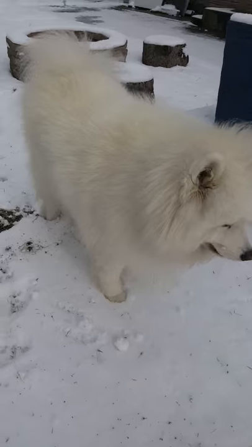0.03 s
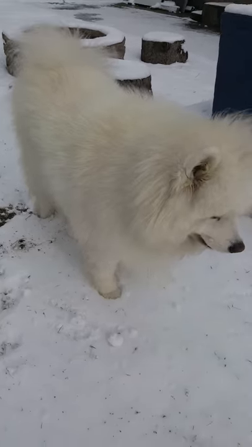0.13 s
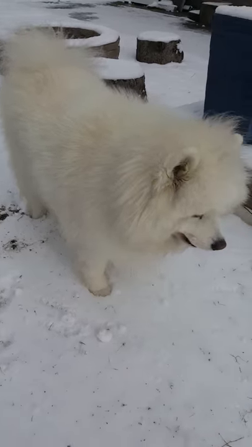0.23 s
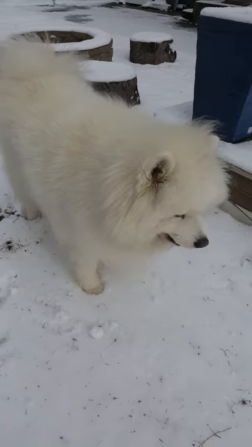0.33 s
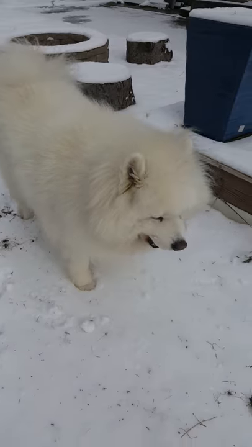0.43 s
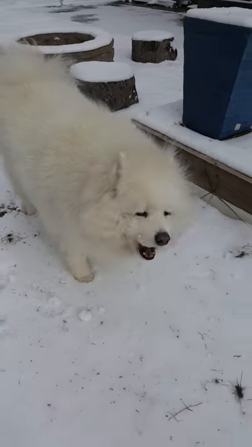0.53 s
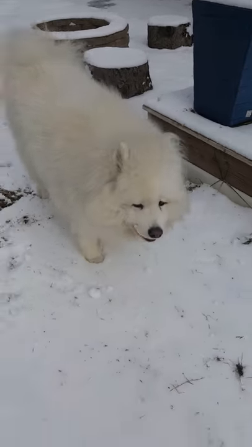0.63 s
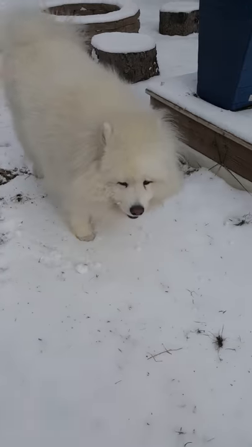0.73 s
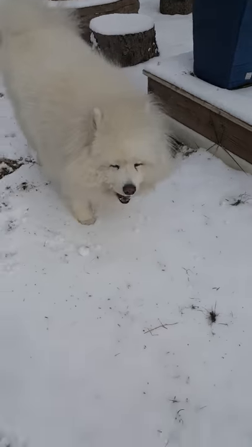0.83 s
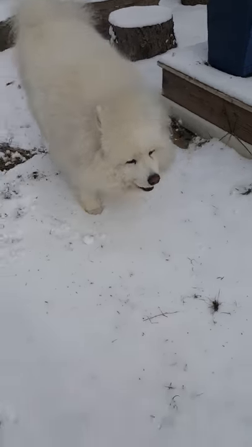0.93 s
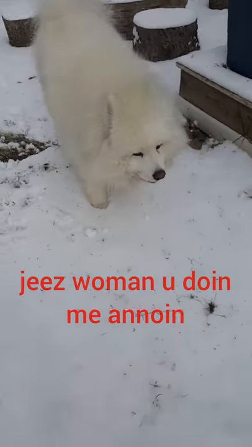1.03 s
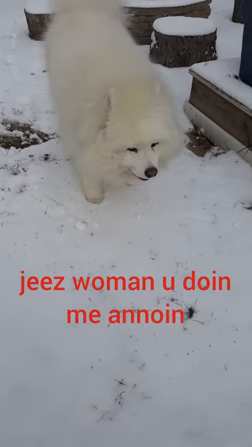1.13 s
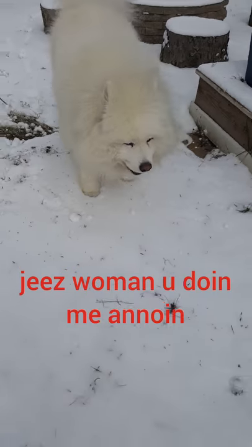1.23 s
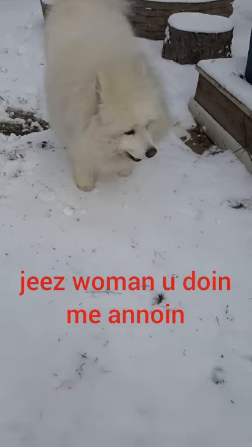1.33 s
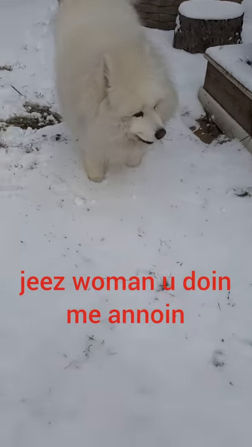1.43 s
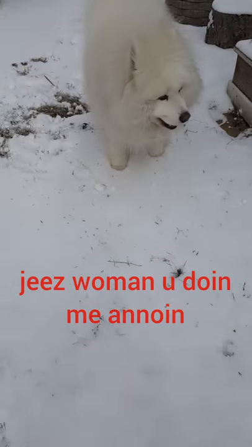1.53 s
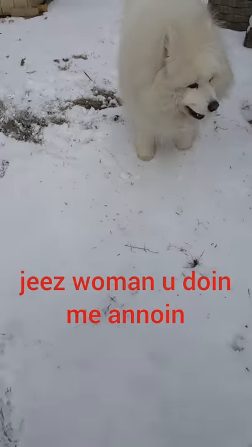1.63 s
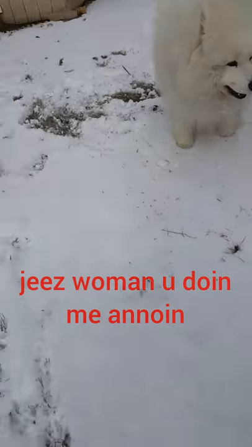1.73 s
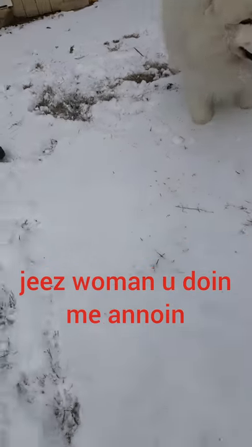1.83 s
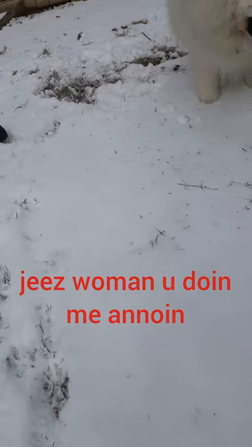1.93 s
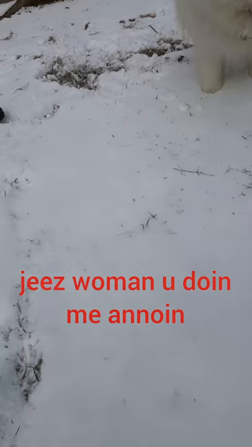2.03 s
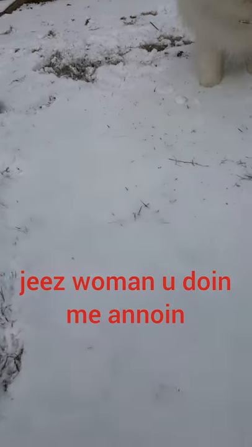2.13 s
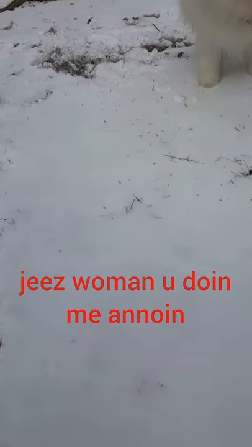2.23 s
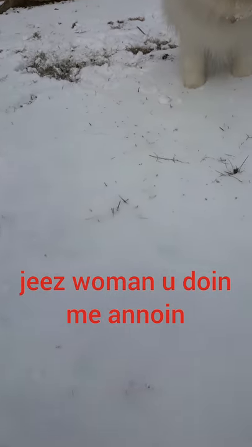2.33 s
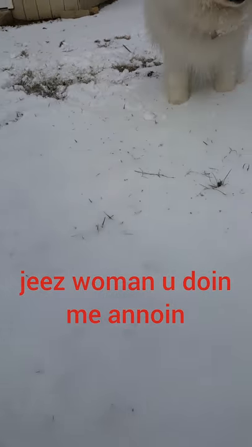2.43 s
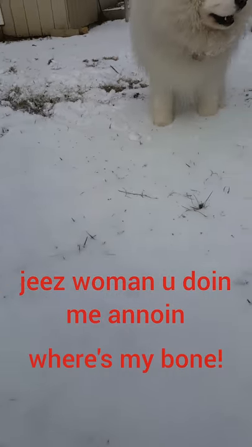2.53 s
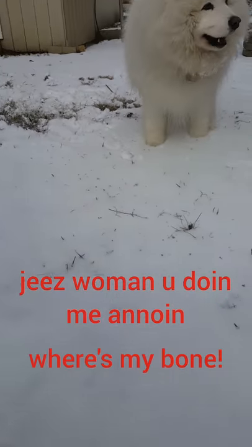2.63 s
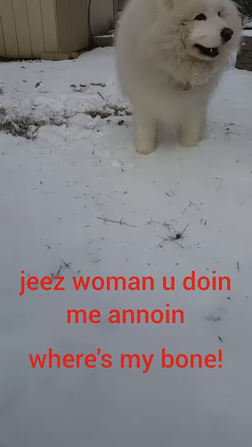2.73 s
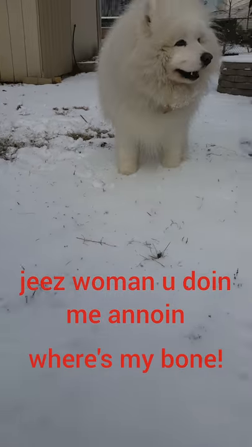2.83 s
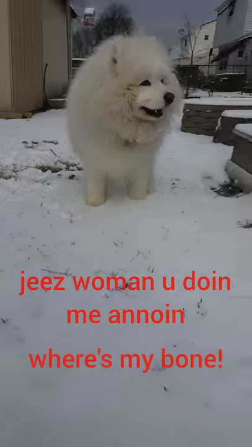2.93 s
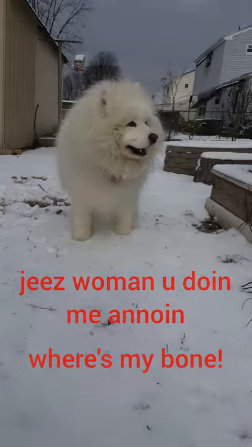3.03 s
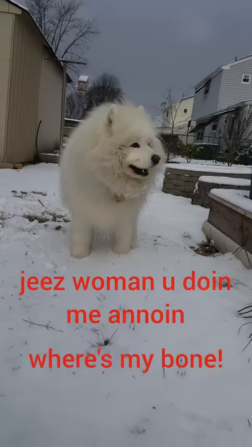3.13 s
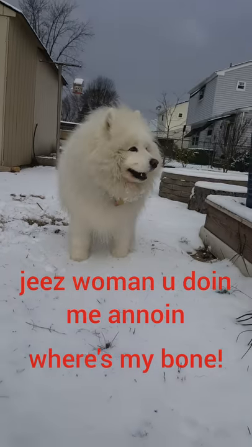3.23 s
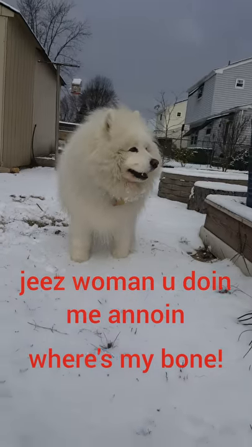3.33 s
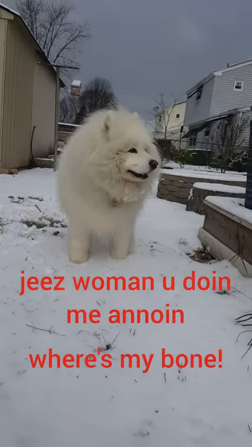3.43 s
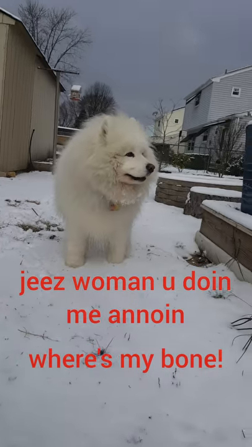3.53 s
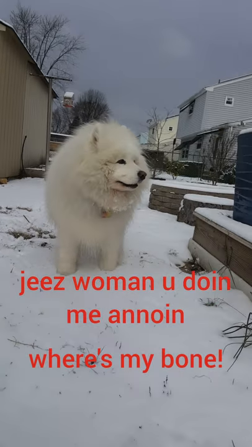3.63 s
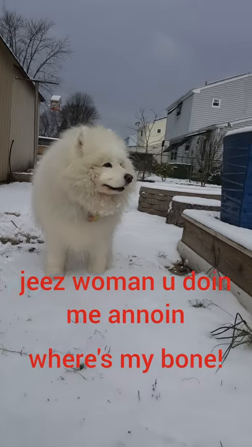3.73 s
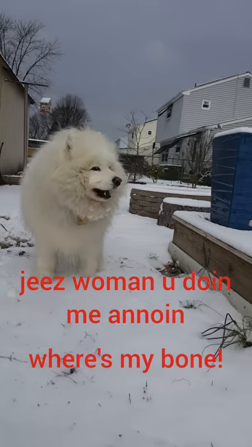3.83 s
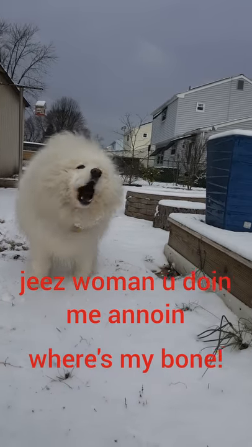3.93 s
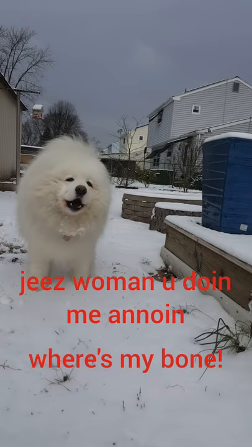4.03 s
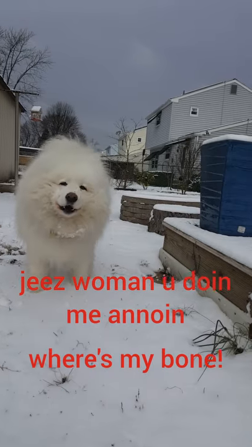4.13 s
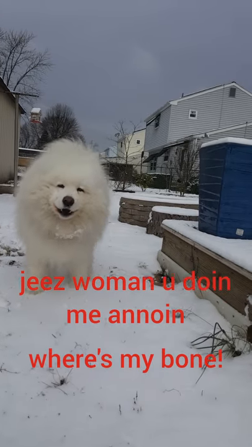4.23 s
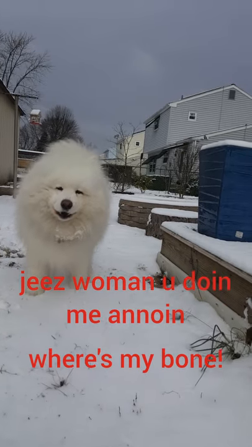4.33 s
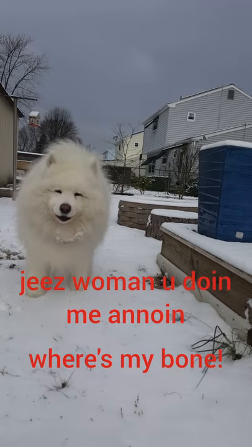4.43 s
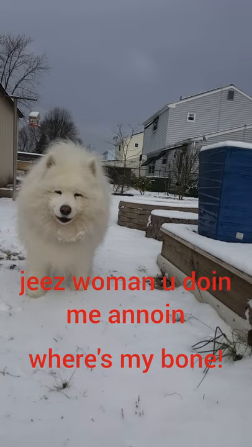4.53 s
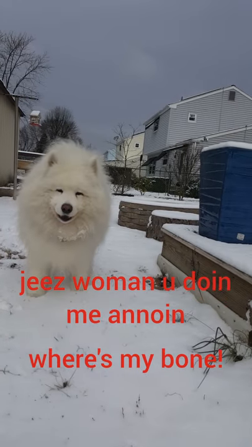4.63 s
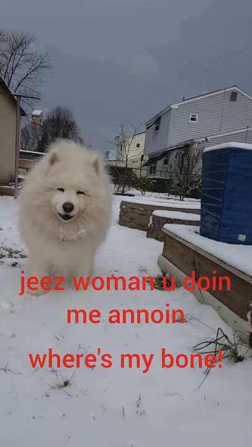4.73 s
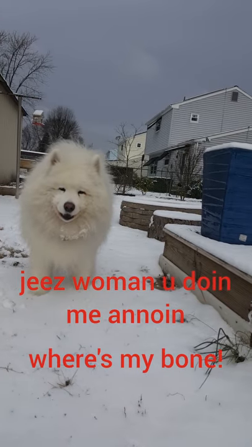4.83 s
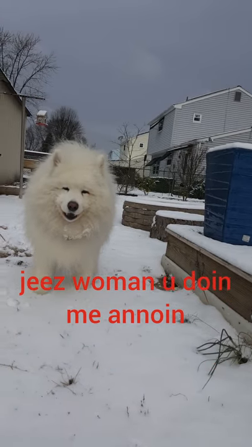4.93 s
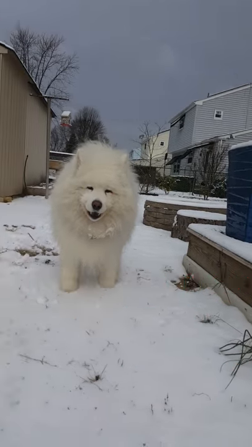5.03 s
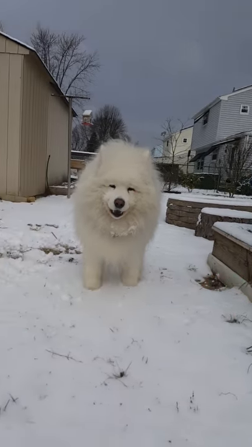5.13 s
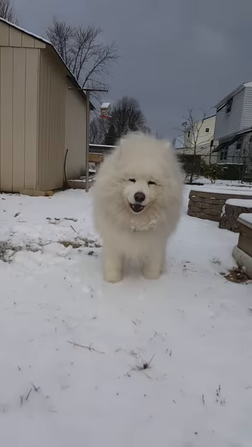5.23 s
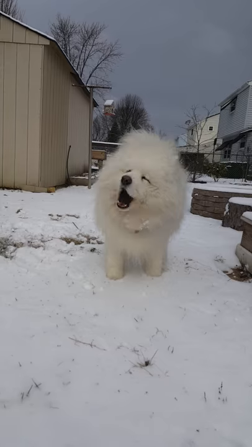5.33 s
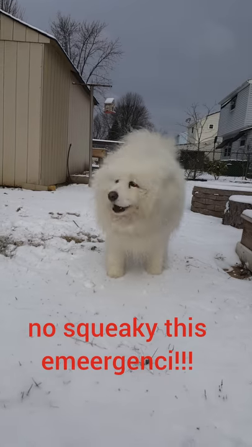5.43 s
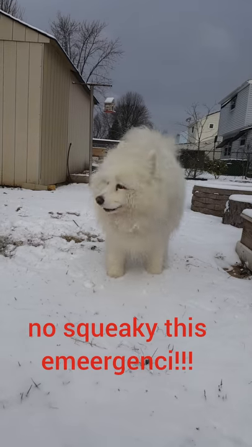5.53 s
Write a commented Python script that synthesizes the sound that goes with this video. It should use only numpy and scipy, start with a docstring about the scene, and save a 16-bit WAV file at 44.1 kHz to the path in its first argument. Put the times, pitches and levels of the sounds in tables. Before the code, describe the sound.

Outdoors, five loud, abrupt barks, each starting rough and chesty, cracking into a yelp and dropping away, with a short dull echo from the yard. Small footsteps and snow crunches sit between them. Near the end, a toy gives airy, high squeaks in uneven strokes around the last bark. The microphone distorts on the louder barks, and its background of low rumble swells in the pauses.

```python
"""A big dog barks five times close by in a snowy yard, and a rubber squeaky toy is squeezed in quick strokes.
Each bark rises in a rough chest voice, breaks into a clear yelp and drops away, with a hiss of rushing air that
outlasts it a little. The toy is a stack of reed overtones with leaking air; short noise bursts make footsteps,
snow crunches and a faint bark echo or distant dog. Far traffic hums, and the yard answers with a dull echo.
Loud sounds take away the recorder's gain boost, and at set moments its input overloads with a harsh crackle."""
import sys
import numpy as np
from scipy import signal
from scipy.fft import rfft, irfft, next_fast_len
from scipy.io import wavfile
from scipy.ndimage import uniform_filter1d

SR = 44100
rng = np.random.default_rng(int(sys.argv[2]) if len(sys.argv) > 2 else 0)


def generate_wav(sig):
    """Save sig (samples, or channels by samples) to the path in sys.argv[1] as 16-bit PCM at SR."""
    pcm = np.round(np.clip(np.atleast_2d(sig).T, -1, 1) * 32767).astype(np.int16)
    wavfile.write(sys.argv[1], SR, pcm)


N = 245637
T = np.arange(N) / SR   # time of every sample, in seconds
CUTOFF_HZ = 16000   # no overtones from here up
PLUNGE_S = .028   # the closing plunge of a bark starts this long before its end

# air rushing through the dog's throat: f/Hz, relative level per Hz/dB
RASP = [(250, -32), (500, -16), (850, -5), (1300, -3.5), (1900, -4.5), (2600, -9), (3400, -22), (5500, -35),
        (9000, -39.5)]


def from_db(db):
    """Turn decibels into a gain factor."""
    return 10 ** (np.asarray(db) / 20)


def rms_one(x):
    """Scale a sound to unit power."""
    return x / np.sqrt(np.mean(x ** 2) + 1e-20)


def curves(rows, t):
    """Read every column of a time table at times t, with straight lines between the rows."""
    s, *columns = np.transpose(rows)
    return [np.interp(t, np.sort(s), column) for column in columns]


def gain_at(spectrum, hz):
    """Read the gain of a spectrum, joining its points by straight lines in dB over log frequency."""
    f, db = np.transpose(spectrum)
    return from_db(np.interp(np.log(np.maximum(hz, 1)), np.log(f), db))


def noise(spectrum, size):
    """Random noise of a given colour, at unit power."""
    padded = next_fast_len(size)
    hz = np.arange(padded // 2 + 1) * SR / padded
    coloured = rfft(rng.standard_normal(padded)) * gain_at(spectrum, hz)
    return rms_one(irfft(coloured, padded)[:size])


def wide_noise(spectrum, size, width):
    """Stereo noise: one part shared by both sides and one part opposed between them."""
    shared = noise(spectrum, size)
    opposed = noise(spectrum, size) * [[1], [-1]]
    return (shared + width * opposed) / np.hypot(1, width)


def wobble(rate_hz, size):
    """Smooth random wandering of unit strength."""
    sos = signal.butter(2, rate_hz, fs=SR, output="sos")
    return rms_one(signal.sosfilt(sos, rng.standard_normal(size + SR // 10))[-size:])


def span(start, end):
    """Sample times between two moments."""
    return T[int(start * SR):int(end * SR)]


def gate(t, start, end, rise, fall):
    """A level that opens from start and is shut again at end."""
    return np.clip((t - start) / rise, 0, 1) * np.clip((end - t) / fall, 0, 1)


def add(out, t, x):
    """Mix a sound in at its sample times."""
    first = round(t[0] * SR)
    out[..., first:first + len(t)] += x


def harmonics(hz, colour, lift_db=0, flutter_db=0, flutter_hz=45, count=14):
    """Fluttering overtones on a moving pitch, shaped by a resonator and evened to unit power; also the phase."""
    phase = 2 * np.pi * np.cumsum(hz) / SR
    k = np.arange(1, count + 1)[:, None]
    flutter = flutter_db * np.array([wobble(flutter_hz, len(hz)) for _ in k])
    above_fundamental = from_db((lift_db + flutter) * (k > 1))
    weight = gain_at(colour, k * hz) * (k * hz < CUTOFF_HZ) * above_fundamental
    power = (weight ** 2).sum(0) / 2
    return (weight * np.sin(k * phase)).sum(0) / np.sqrt(power), phase


def dog(pan_db=0.5445, hiss_db=-37.0):
    """Chest voice and yelp overlap where the voice breaks; each reaches the right side a little later."""
    # one row per bark: start t/s, full pressure t/s, voice breaks t/s, yelp leaps t/s, end t/s,
    # chest voice: onset/dB, held/dB, left under the yelp/dB, roughness (0-1), surge before the break/Hz,
    # yelp: entry f/Hz, top f/Hz, level/dB; both voices: overtone lift/dB, rasp/dB, right side lag/ms
    barks = [(0.508, 0.5329, .576, 0.6085, .658, -13.5, -9, -11.5, 0.857, 13.16, 1218, 1466, -15.5, -1.79, -16.5, 0.0272),
             (0.871, 0.9006, .941, 0.979, 1.027, -25, -9.5, -20.5, 0.699, 7.12, 1097, 1442, -14, -3, -15.5, 0.118),
             (1.973, 2.006, 2.044, 2.086, 2.128, -15, -14.5, -25, .5, 15, 1085, 1415, -12, 2, -10, .23),
             (3.953, 3.980, 4.024, 4.053, 4.098, -19.5, -11, -15, 0.61, 115, 1082, 1135, -8.5, -4, -12.5, 0.0051),
             (5.367, 5.393, 5.420, 5.45, 5.506, -15, -1, -26.5, 0.308, 67.4, 1101, 1153, -8, -1.4, -17.5, 0.0816)]
    out = np.zeros((2, N))
    for (start, full, breaks, leap, end, onset_db, held_db, under_db, rough, surge_hz,
         entry_hz, top_hz, yelp_db, lift_db, rasp_db, lag_ms) in barks:
        chest = chest_gesture(start, full, breaks, leap, end, onset_db, held_db, under_db, rough, surge_hz)
        yelp = yelp_gesture(breaks, leap, end, entry_hz, top_hz, yelp_db)
        for t, x in (chest_voice(*chest, lift_db, rasp_db), yelp_voice(*yelp, lift_db, rasp_db)):
            late = np.interp(t - lag_ms / 1000, t, x)
            add(out, t, np.array([x, late]) * from_db([[pan_db / 2], [-pan_db / 2]]))
        t, hiss = teeth_hiss(start, end)
        add(out, t, from_db(hiss_db) * hiss)
    # the mouth radiates little below this pitch
    return signal.sosfilt(signal.butter(3, 340, "high", fs=SR, output="sos"), out)


def chest_gesture(start, full, breaks, leap, end, onset_db, held_db, under_db, roughness, surge_hz,
                  ease_s=.008, surge_s=.009):
    """Pitch and level climb with pressure; the voice is roughest before the break, then clears, sags and fades."""
    start_hz, top_hz, sag_hz, sag_s = 384.56, 661.34, 72.1, .026
    attack_s, attack_db = .009, 17.5   # the folds take a few beats to get going
    climb_db, bloom_db, bloom_s = -17.5, -5, 0.011   # blooms on reaching the first mouth resonance
    rough_onset = 0.13   # roughness (0-1) on the way up
    stop = end - PLUNGE_S
    t = span(start, stop)
    climb = np.clip((t - start) / (full - start), 0, 1) ** 1.4
    since_ease = t - breaks + ease_s
    surge = np.exp(-(since_ease / surge_s) ** 2)
    sag = 1 - np.exp(-np.maximum(since_ease, 0) / sag_s)
    hz = start_hz + (top_hz - start_hz) * climb + surge_hz * surge - sag_hz * sag
    db = np.interp(
        t,
        [start, start + attack_s, full - bloom_s, full, full + bloom_s,
         breaks, breaks + ease_s, leap, stop],
        [onset_db - attack_db, onset_db, climb_db, bloom_db, held_db,
         held_db + 2.0, (held_db + under_db) / 2, under_db, -40])
    rough = np.interp(t, [full, full + bloom_s, breaks - ease_s, breaks + ease_s],
                      [rough_onset, roughness, roughness, 0])
    return t, hz, db, rough


def chest_voice(t, hz, db, rough, lift_db, rasp_db, jitter=0.033, half_tone=0.71):
    """Under full pressure the vocal folds beat unevenly and let air through in puffs."""
    # throat and mouth: f/Hz, level/dB
    throat = [(250, -28.5), (420, -6), (640, 2), (780, 0.5), (950, -11), (1200, -8), (1450, -21),
              (1750, -21.5), (2050, -17.5), (2450, -14.5), (3100, -36), (4200, -51.5), (9000, -73.5)]
    shaky_hz = hz * (1 + jitter * rough * wobble(350, len(t)))
    tone, phase = harmonics(shaky_hz, throat, lift_db, flutter_db=6.0)
    tone = tone * (1 + .2 * (.2 + rough) * wobble(250, len(t)))
    # cycles grouped in twos and threes put extra tones between the harmonics
    uneven = phase + 1.1 * wobble(70, len(t))
    between = np.sin(3 * uneven / 2) + 0.27 * np.sin(4 * uneven / 3)
    between = between + .6 * np.sin(5 * uneven / 2) + .45 * np.sin(7 * uneven / 2)
    puffs = 1 + .5 * np.sin(phase)
    rasp = from_db(rasp_db) * (0.2 + rough) * noise(RASP, len(t)) * puffs
    level = from_db(db) * gate(t, t[0], t[-1], .005, 0.0033)
    return t, level * (tone + half_tone * rough ** 2 * between + rasp)


def yelp_gesture(breaks, leap, end, entry_hz, top_hz, level_db, swell_s=0.015, swell_db=14):
    """The yelp swells in, creeps up, leaps, arches over and plunges; the mouth sets its strength at each pitch."""
    # strength as the pitch crosses the mouth resonances: f/Hz, level/dB
    mouth = [(410, -16), (490, -2.5), (630, 10), (740, 4), (880, -5.5), (1110, -0.5), (1450, -0.5)]
    creep, leap_s = .42, 0.0042   # share of the rise made before the quick leap; length of the leap
    sag = .9   # pitch ratio left when the plunge starts
    knee_s, knee_hz, last_hz = .02, 703.5, 412   # the plunge bends this long before the end
    spent_s, spent_db = 0.0099, 9   # force lost just ahead of the plunge
    t = span(breaks, end)
    plunge = end - PLUNGE_S
    creep_hz = entry_hz + creep * (top_hz - entry_hz)
    hz = np.interp(t, [breaks, leap - leap_s, leap, (leap + plunge) / 2, plunge, end - knee_s, end],
                   [entry_hz, creep_hz, top_hz, top_hz * sag ** 0.27, top_hz * sag, knee_hz, last_hz])
    force_db = np.interp(t, [breaks, breaks + swell_s, plunge - spent_s, plunge],
                         [-swell_db, 0, 0, -spent_db])
    return t, hz, level_db + force_db + 20 * np.log10(gain_at(mouth, hz))


def yelp_voice(t, hz, db, lift_db, rasp_db, jitter=0.0037, air_db=-10):
    """The clear upper register: a steadier stack of overtones with a little rushing air."""
    # overtones of the upper register: f/Hz, level/dB
    yelp_colour = [(350, -3.5), (650, 11.5), (900, -3), (1200, -5), (1700, -18.5), (2300, -14.5),
                   (2800, -33), (3400, -31), (4500, -54.5), (9000, -63)]
    shaky_hz = hz * (1 + jitter * wobble(400, len(t)))
    tone, _ = harmonics(shaky_hz, yelp_colour, lift_db, flutter_db=6.5, count=8)
    air = from_db(rasp_db + air_db) * noise(RASP, len(t))
    return t, from_db(db) * gate(t, t[0], t[-1], .005, .004) * (tone + air)


def teeth_hiss(start, end, peak_s=0.052, linger_s=.045, onset_db=-19, closing_db=-10):
    """The blast of air peaks as the jaw opens and outlasts the voice a little."""
    # air hissing over tongue and teeth: f/Hz, relative level per Hz/dB
    teeth = [(1200, -26), (2600, 5.5), (4000, -4.5), (5500, -0.5), (8500, -3.5), (10500, -16.5),
             (16000, -17)]
    t = span(start, end + linger_s)
    db = np.interp(t, [start, start + peak_s, end, end + linger_s], [onset_db, 0, closing_db, -32])
    level = from_db(db) * gate(t, start, t[-1], .006, .005)
    return t, level * wide_noise(teeth, len(t), 1.0)


def toy(jitter=0.0024, swell_db=5, pan_db=-8, early_hiss_db=-12):
    """The reed's pitch and strength arch with each squeeze's pressure; as it stalls, more air hisses past it."""
    # squeezes: start t/s, length/s, first f/Hz (only its distance from the top counts), top f/Hz, level/dB
    squeezes = [(4.346, 0.0335, 1219, 1229, -43.5), (4.472, 0.021, 1300, 1306, -40),
                (4.608, 0.07685, 1206, 1204, -43.5), (4.753, 0.0313, 1245, 1241, -47),
                (4.871, 0.0553, 1163, 1255, -39), (5.005, 0.03, 1268, 1297, -42.5),
                (5.197, .088, 1177, 1262, -38.5), (5.365, 0.051, 1300, 1310, -39),
                (5.482, 0.078, 1335, 1350, -36)]
    # reed and its tube: f/Hz, level/dB
    reed = [(1250, -13), (2500, 0), (3750, -11), (5000, -5.5), (6300, -5.5), (7600, -5.5), (8800, 4.5),
            (10100, -4), (11400, -15), (12800, -13), (15500, -25.5)]
    # air leaking past the reed: f/Hz, relative level per Hz/dB
    reed_air = [(1500, -14), (4000, -7.5), (7000, -6), (9300, -2.5), (12000, -4), (16000, -14)]
    stall_hz, let_go_s = 1126.5, .049   # each squeeze sinks to the stalling pitch within this time
    leak_db, leak_db_per_s, leak_least_db = -5.5, -130, -15.5   # quick squeezes leak more air
    out = np.zeros((2, N))
    for s, length, first_hz, top_hz, db in squeezes:
        end = s + length
        t = span(s, end + 0.02645)
        # roots of the pitch steps, so that squaring makes a smooth arch
        up, down = np.sqrt(abs(top_hz - first_hz)), np.sqrt(abs(top_hz - stall_hz))
        crest = end - min(let_go_s, length * down / (up + down))
        below_top_hz = np.interp(t, [s, crest, end], [-up, 0, down]) ** 2
        hz = (top_hz - below_top_hz) * (1 + jitter * wobble(650, len(t)))
        tone, _ = harmonics(hz, reed, flutter_db=1.0, flutter_hz=25.55, count=13)
        strength = from_db(swell_db * (-0.1264 - below_top_hz / 100))
        tone = tone * gate(t, s, end + 0.00356, 0.0024, 0.00816) * strength
        hiss_db = max(leak_db + leak_db_per_s * length, leak_least_db)
        leak = from_db(hiss_db + np.interp(t, [s, end], [early_hiss_db, 0]))
        leak = leak * gate(t, s, t[-1], 0.0042, 0.0451)
        add(out, t, from_db(db) * (tone + leak * wide_noise(reed_air, len(t), 1.0)))
    return out * from_db([[pan_db / 2], [-pan_db / 2]])


def yard(x, near_db=-13, near_t60=.06, tail_db=-27, tail_t60=0.4333):
    """Close scatter from ground and planters, a dull tail, and smeared echoes from the houses."""
    # what the yard returns: f/Hz, level/dB
    yard_colour = [(200, -9), (600, -1), (1200, 8.5), (1800, 4.5), (2500, 3.5), (3500, -4), (9000, -6.5),
                   (16000, -20)]
    # far house fronts: delay/s, level/dB
    houses = [(.19, -52.5), (.31, -56), (0.421, -57.5)]
    t = span(0, 1.0)
    near = wide_noise([(200, -10.0), (700, -1), (1400, 7), (16000, -19.5)], len(t), 1.0)
    near = near * from_db(-60 * t / near_t60) * (t > .001)
    tail = from_db(-60 * t / tail_t60) * gate(t, 0.016, 0.84, 0.017, .1)
    tail = from_db(tail_db) * tail / np.linalg.norm(tail)
    for delay, db in houses:
        echo = np.exp(-((t - delay) / 0.05) ** 2)
        tail = tail + from_db(db) * echo / np.linalg.norm(echo)
    # undo the unit-power scaling, so the spectrum's own gain counts
    colour_gain = np.sqrt(np.mean(gain_at(yard_colour, np.linspace(0, SR / 2, len(t))) ** 2))
    colour = wide_noise(yard_colour, len(t), 0.54) * colour_gain
    response = from_db(near_db) * near / np.linalg.norm(near[0]) + tail * colour
    return signal.fftconvolve(x, response, axes=1)[:, :N]


def snow_and_faint_bark(width=0.753, spread=1.194):
    """Each small sound is a short dying noise burst, spread about one pitch."""
    # footsteps, snow crunches, and at 1.32 and 1.38 s a faint bark echo or distant dog:
    # t/s, peak before the recorder's gain/dB, centre f/Hz, time to die by 30 dB/s
    small_sounds = [(.015, -48, 332, .022), (.042, -45.5, 890, 0.0096), (.140, -42, 1550, 0.0133),
                    (.408, -34, 398.1, 0.00333), (1.2, -41.5, 303, 0.063), (1.32, -51, 2199, 0.26),
                    (1.38, -43.5, 700, 0.1005), (1.569, -39.5, 437, 0.01), (1.70, -44.5, 366.4, 0.0734),
                    (2.789, -53.5, 6900, 0.0047), (2.888, -59.5, 3525, 0.0235), (2.947, -49.5, 2803, 0.018),
                    (2.992, -58, 4010, 0.0072), (3.012, -46, 2710, 0.00194), (3.024, -52, 5060, 0.0252),
                    (3.0725, -48, 2890, 0.0046), (3.091, -52, 12550, 0.0075)]
    out = np.zeros((2, N))
    for s, db, hz, decay_s in small_sounds:
        t = span(s, s + decay_s + 0.014)
        fade = from_db(-30 * (t - t[0]) / decay_s)
        burst = wide_noise([(20, 0), (20000, 0.0043)], len(t), width) * fade
        band = [hz / spread, min(hz * spread, .45 * SR)]
        burst = signal.sosfilt(signal.butter(1, band, "band", fs=SR, output="sos"), burst)
        top = min(hz * spread * 2, .45 * SR)
        burst = signal.sosfilt(signal.butter(1, top, fs=SR, output="sos"), burst)
        add(out, t, from_db(db) * burst / np.abs(burst).max())
    return out


def traffic(rumble_db=-68, hum_waver=0.0087):
    """Low rumble, a wavering engine note and the airy wash of far roads."""
    # low rumble: f/Hz, relative level per Hz/dB
    rumble = [(20, -8.5), (50, -0.5), (120, -0.5), (200, -7.5), (320, -16.5), (600, -44)]
    # a far engine: t/s, f/Hz, level against the rumble/dB
    engine = [(0, 120.6, -9.5), (2.8, 128, -12), (3.15, 143, -8.5), (3.8, 144.4, -2), (4.5, 126, -5.5)]
    # airy wash: f/Hz, relative level per Hz/dB
    air = [(150, -13), (400, -2), (750, 3), (1200, -1.5), (2200, -10.5), (4000, -19.5), (6500, -24.5),
           (9000, -21), (12000, -28.5), (16000, -32)]
    # loudness of the wash before the recorder's gain: t/s, level/dB
    air_level = [(0, -59.5), (.25, -68), (1.9, -66.5), (2.9, -74), (5.57, -69)]
    air_db, = curves(air_level, T)
    hz, hum_db = curves(engine, T)
    phase = 2 * np.pi * np.cumsum(hz * (1 + hum_waver * wobble(10, N))) / SR
    hum = from_db(hum_db) * np.sqrt(2) * np.sin(phase)
    low = from_db(rumble_db) * (wide_noise(rumble, N, 0.49) + hum)
    return low + from_db(air_db) * wide_noise(air, N, 0.49)


def scene():
    """Dog and toy in the yard, over small sounds and traffic."""
    close = dog() + toy()
    return close + yard(close) + snow_and_faint_bark() + traffic()


def gain_control(x):
    """Quiet stretches are boosted; loud sound cancels the boost, which waits and then creeps back."""
    loud_db, look_ahead_s = -28, .012
    boost_limit_db, hold_s, recover_db_per_s = 16, 0.4958, 37.5
    loud = uniform_filter1d((x ** 2).mean(0), size=220) > from_db(loud_db) ** 2
    since_loud = T - np.maximum.accumulate(np.where(loud, T, -np.inf))
    boost_db = np.clip((since_loud - hold_s) * recover_db_per_s, 0, boost_limit_db)
    early_db = np.interp(T + look_ahead_s, T, boost_db)   # acts just ahead of the sound
    return x * from_db(uniform_filter1d(early_db, size=220))


def overload(x, edge=16, swing=1.42, drive_hz=950, thump_db=-3, linger=0.87, linger_db=-10):
    """The strong fundamental pushes peaks past the ceiling; they wrap round with a harsh crackle and a low thump."""
    # microphone overloads: from t/s, to t/s, ceiling as a share of the peak, wrapped level/dB, fizz/dB
    overloads = [(0.9316, .933, .99, 0, -8.5), (2.0135, 2.019, .8, 3, -30), (2.028, 2.033, 1.19, 9, -21),
                 (3.982, 4, 0.867, -1, -26), (4.001, 4.034, .8, 6, -16), (5.397, 5.431, 0.834, -0.5, -18.5)]
    # chatter of the overloaded input: f/Hz, relative level per Hz/dB
    fizz = [(600, -11), (2000, 5.5), (4500, 0), (8000, -8.5), (16000, -15)]
    # the microphone recovering from overload: f/Hz, relative level per Hz/dB
    thump_colour = [(25, 4), (55, 2.5), (120, -5), (300, -8.5), (900, -31), (4000, -72)]

    def peak_of(v):
        """Running peak height, as for a sine of the same power."""
        return np.sqrt(2 * uniform_filter1d(v ** 2, size=140, axis=1) + 1e-12)

    out = x.copy()
    fundamental = signal.sosfiltfilt(signal.butter(2, drive_hz, fs=SR, output="sos"), x)
    for start, end, ceiling, db, fizz_db in overloads:
        t = span(start - .006, end + 0.0055)
        first = round(t[0] * SR)
        part = x[:, first:first + len(t)]
        drive = fundamental[:, first:first + len(t)]
        # the ceiling is not met cleanly: the signal chatters across it
        chatter = 0.058 * rng.standard_normal(part.shape) + 0.14 * wobble(90, len(t))
        height = np.abs(drive) / peak_of(drive) + chatter
        over = (1 + np.tanh(edge * (height - ceiling))) / 2
        wrapped = from_db(db) * (part - swing * peak_of(part) * np.sign(drive) * over)
        wrapped = wrapped + from_db(fizz_db) * wide_noise(fizz, len(t), .8)
        # fade from the plain sound to the wrapped one and back
        window = gate(t, start - .0005, end + 0.00048, 0.00074, 0.0022)
        high_pass = signal.butter(1, 160, "high", fs=SR, output="sos")
        crackle = signal.sosfilt(high_pass, window * (wrapped - part))
        thump = from_db(fizz_db + thump_db) * wide_noise(thump_colour, SR // 4, 1.0)[:, :len(t)]
        add(out, t, crackle + gate(t, start - .002, end + 0.00057, .003, 0.0049) * thump)
        # the longer the overload, the longer the input sizzles afterwards
        t = span(end, end + 0.001 + linger * (end - start))
        level = from_db(fizz_db + linger_db) * gate(t, end, t[-1], .001, 0.0042)
        add(out, t, level * wide_noise(fizz, len(t), 0.27))
    return out


def record(dry):
    """The gain follows the loudness, the input overloads, peaks are rounded and the top treble is cut."""
    x = overload(gain_control(dry))
    x = x / (1 + (x / .93) ** 8) ** (1 / 8)
    return signal.sosfilt(signal.cheby2(16, 70, CUTOFF_HZ + 700, fs=SR, output="sos"), x)


dry = scene()
out = record(dry)
generate_wav(out)
```